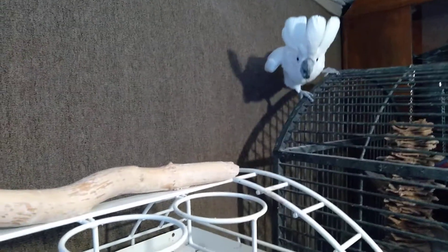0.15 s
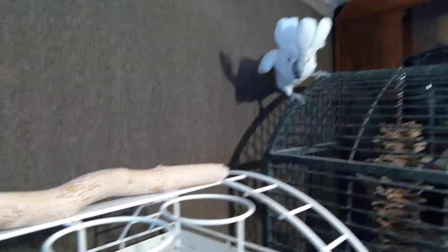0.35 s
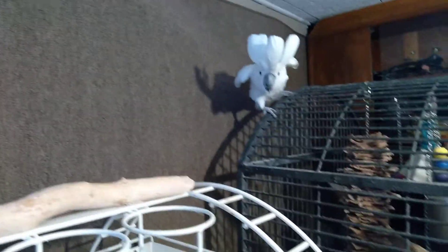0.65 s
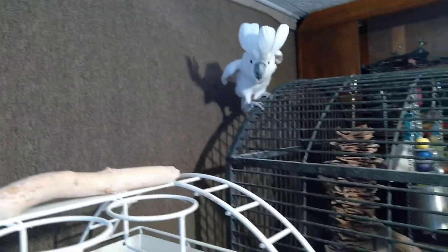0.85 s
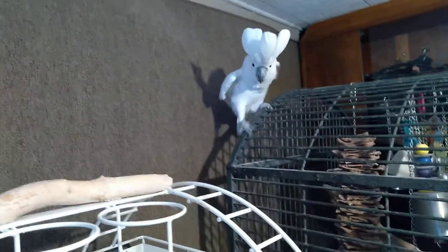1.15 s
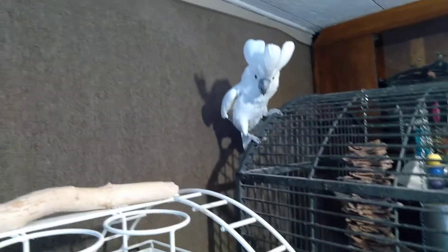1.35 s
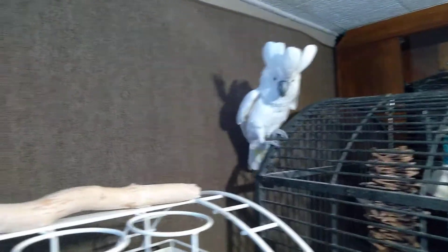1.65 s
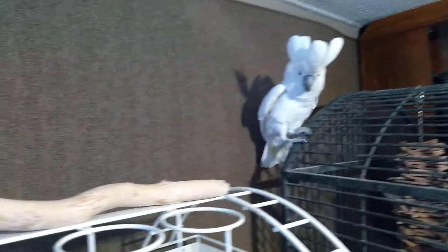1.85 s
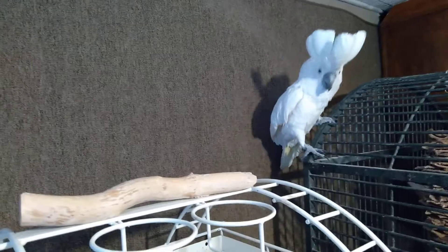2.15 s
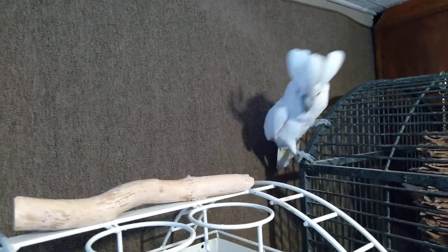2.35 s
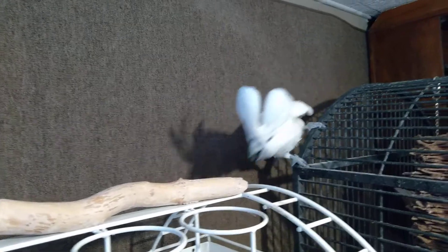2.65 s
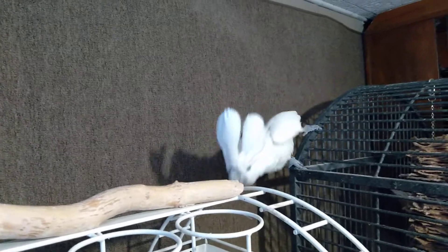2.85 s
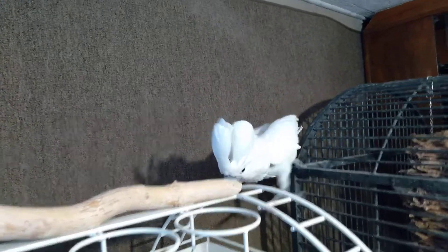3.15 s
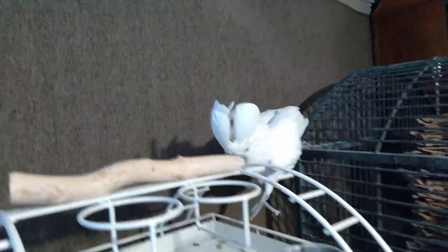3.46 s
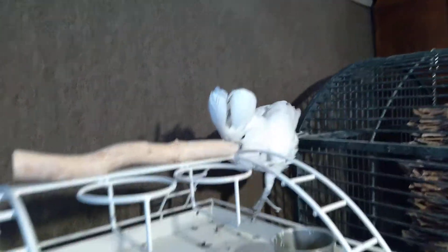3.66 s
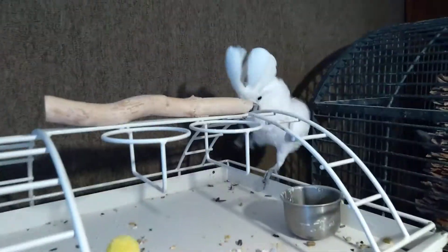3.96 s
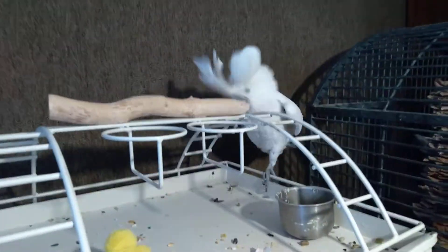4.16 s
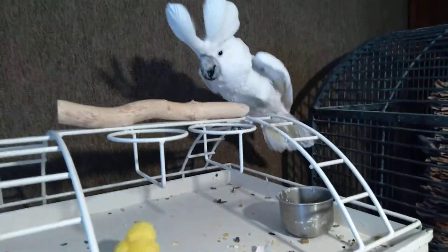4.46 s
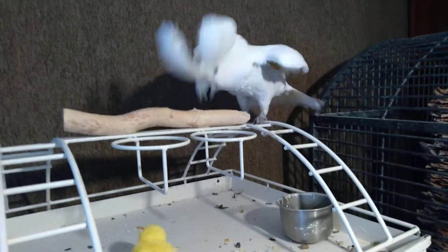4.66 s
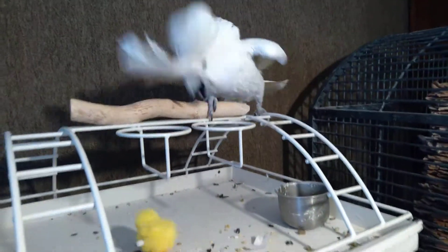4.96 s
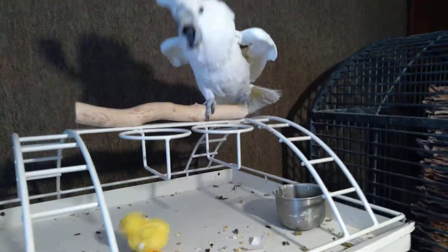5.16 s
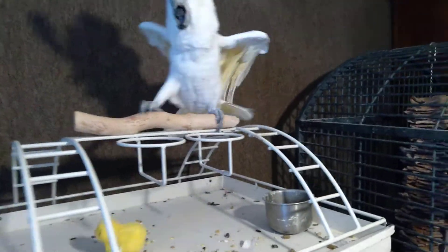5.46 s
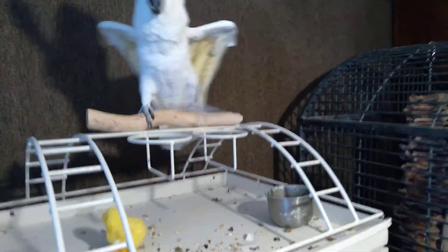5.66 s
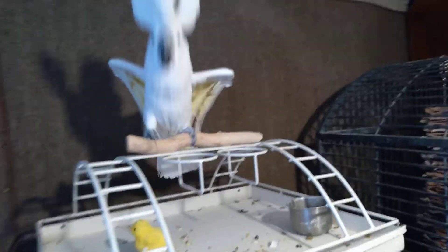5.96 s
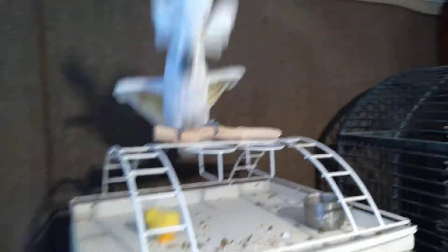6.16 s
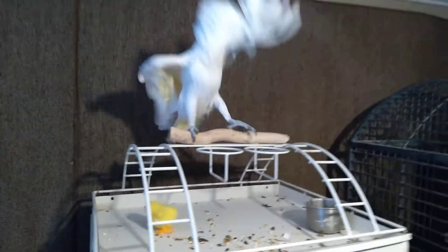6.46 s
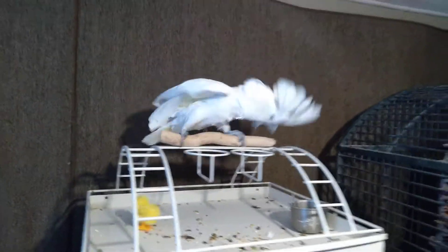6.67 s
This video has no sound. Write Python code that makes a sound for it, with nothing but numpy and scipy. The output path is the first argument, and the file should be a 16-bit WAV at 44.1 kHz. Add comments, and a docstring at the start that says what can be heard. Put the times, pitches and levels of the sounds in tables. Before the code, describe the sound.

Fast paired metal clicks, wiry scrapes and a dull drumming tray as a bird stand is dragged, with a short lull and late feathery rustles.

```python
"""Sharp metallic ticks, mostly in pairs, over scraping and low drumming: a metal bird stand on casters is
dragged over a hard floor in a small room, close to a two-port phone. Ticks are short noise contacts with
chatter; the tray drums in noise-driven modes; wire and feathers scrape and rustle as shaped noise bands;
a few touched wires ring; the frame bangs twice. Diffuse echoes and quiet room air lie behind."""
import sys
import numpy as np
from scipy import signal
from scipy.fft import rfft, irfft
from scipy.io import wavfile
from scipy.ndimage import uniform_filter1d

SR = 44100
rng = np.random.default_rng(int(sys.argv[2]) if len(sys.argv) > 2 else 0)


def output_pcm(signal):
    """Save a mono or channel-first signal as 16-bit PCM at the path in sys.argv[1].

    Samples are clipped to [-1, 1] before scaling.
    """
    pcm = np.clip(np.atleast_2d(signal).T, -1, 1) * 32767
    wavfile.write(sys.argv[1], SR, np.round(pcm).astype(np.int16))


N = 299880
TIME = np.arange(N) / SR


def undb(db):
    """Amplitude gain of a level in dB."""
    return 10 ** (np.asarray(db) / 20)


def unit(x):
    """Scale to an RMS of 1."""
    return x / np.sqrt(np.mean(x ** 2))


def fade(t, t60):
    """Exponential decay from t = 0, by 60 dB in t60 seconds."""
    return (t >= 0) * 1000. ** (-np.maximum(t, 0) / t60)


def colour(x, points):
    """Filter by (frequency [Hz], gain [dB]) points, joined over log frequency."""
    hz, db = np.transpose(points)
    f = np.fft.rfftfreq(N, 1 / SR) + 1
    gain_db = np.interp(np.log(f), np.log(hz), db)
    return irfft(rfft(x) * undb(gain_db), N)


def resonate(x, modes):
    """Sum of (frequency [Hz], width [Hz], power share [dB]) resonances."""
    out = 0
    for hz, width_hz, db in modes:
        b, a = signal.iirpeak(hz, hz / width_hz, SR)
        out = out + undb(db) / np.sqrt(width_hz) * signal.lfilter(b, a, x)
    return out


def highpass(x, hz):
    """Second-order bass cut."""
    return signal.sosfilt(signal.butter(2, hz, "high", fs=SR, output="sos"), x)


def walk(rate_hz):
    """Random levels held 1 / rate_hz and slewed; spread near 1."""
    hold = int(SR / rate_hz)
    steps = np.repeat(rng.standard_normal(N // hold + 1), hold)
    return uniform_filter1d(steps, hold)[:N]


def curves(table):
    """Each column of a time table as a curve over the whole scene."""
    s, *columns = np.transpose(table)
    return [np.interp(TIME, s, column) for column in columns]


def pan(left_minus_right_db):
    """Gains of the two ports."""
    return undb(left_minus_right_db * np.array([[.5], [-.5]]))


def spread(alike):
    """Noise at two ports from a wide source: a shared part and a part of their own."""
    shared = np.sqrt(alike) * rng.standard_normal(N)
    return shared + np.sqrt(1 - alike) * rng.standard_normal((2, N))


def crest(x, db):
    """Scale a short sound so that its loudest two milliseconds have the given level."""
    power = uniform_filter1d(np.mean(x ** 2, axis=0), size=100)
    return x * undb(db) / np.sqrt(power.max())


# room air spectrum: (frequency [Hz], density [dB per Hz])
AIR_SPECTRUM = [(15, -45.5), (25, -21), (80, -9.5), (175, -21.5), (335, -6.5), (1400, -27.5), (6210, -36.5),
                (9570, -30), (16000, -48)]
AIR_DB = -67


def hush():
    """Quiet air of the room: coloured noise, unrelated at the two ports."""
    return undb(AIR_DB) * np.array([unit(colour(rng.standard_normal(N), AIR_SPECTRUM)) for _ in range(2)])


ROOM_T60_S, ROOM_DB = 0.22, -10


def room(x):
    """Diffuse echoes, unrelated at the two ports: decaying noise as impulse response."""
    t = TIME[:SR // 2]
    tail = rng.standard_normal((2, len(t))) * fade(t - .002, ROOM_T60_S)
    tail /= np.sqrt(np.sum(tail ** 2, axis=1, keepdims=True))
    return undb(ROOM_DB) * signal.fftconvolve(x[None], tail, axes=1)[:, :N]


# the sound turns narrow and hollow as the stand draws away: (time [s], likeness at the ports [0-1],
# hollow share [0-1], tray left minus right [dB], casters left minus right [dB])
DRAWING_AWAY = [(0, 0, 0.12, 1.5, -6), (2, 0, 0, 0, -5.5), (5.2, 0.23, 0.22, 2, -2.5),
                (5.7, 0.3, 1, 8.5, 2.5), (6.8, 0.6, 0.67, 5, -3.5)]


def drawing_away():
    """Curves of likeness, hollowness, tray pan and caster pan as the stand draws away."""
    return curves(DRAWING_AWAY)


# hollow colour: (frequency [Hz], gain [dB])
HOLLOW_COLOUR = [(500, 2.5), (750, -9), (1050, -6), (1900, 2.5), (2450, -4), (2900, -15), (4100, 0),
                 (5000, 2), (6500, -4), (11000, 1), (14500, -0.5)]


def hollowed(x, share):
    """Blend from the plain sound to one with notches and bumps in its spectrum."""
    return x + share * (colour(x, HOLLOW_COLOUR) - x)


def wiry(x, depth_db):
    """Many wire modes make a jagged, fixed fine structure over frequency."""
    spectrum = rfft(x)
    bumps = uniform_filter1d(np.repeat(rng.standard_normal(N // 300 + 1), 150), size=150)
    return unit(irfft(spectrum * undb(depth_db * bumps[:spectrum.shape[-1]]), N))


# wire spectrum: (frequency [Hz], density [dB per Hz])
WIRE_SPECTRUM = [(1760, -25), (3000, -25), (3580, -17), (5110, -13.5), (6050, -13.5), (7380, -8),
                 (9600, -2), (10500, -5.5), (12100, -13.5), (15400, -15), (16300, -7.5)]
# frame body modes: (frequency [Hz], width [Hz], power share [dB])
BODY_MODES = [(1370, 2000, -4), (2540, 680, 1.5), (3160, 2900, 13)]
# sheet metal modes: (frequency [Hz], width [Hz], power share [dB])
SHEET_MODES = [(480, 31, -3.5), (735, 82, 4), (795, 24, -5), (888, 10, -3.5), (1130, 610, 3)]


def metal():
    """Unit noises in the colours of wire, body and sheet."""
    alike, *_ = drawing_away()
    body_band = signal.butter(2, (1150, 3600), "band", fs=SR, output="sos")
    body = signal.sosfilt(body_band, resonate(spread(alike), BODY_MODES))
    wire = colour(spread(alike), WIRE_SPECTRUM)
    sheet = resonate(spread(0.89), SHEET_MODES)
    return wiry(wire, 3.3), wiry(body, 2.4), unit(sheet)


# wire touches: (time [s], level [dB], t60 [s], thin wire relative level [dB])
WIRE_TOUCHES = [(1.183, -52, 0.41, 0), (1.262, -66, 0.076, 0), (1.533, -54, 0.33, 2),
                (1.708, -58, 0.23, -5), (1.752, -61, 0.19, -5), (1.864, -58, 0.12, -3)]
# touched wire modes: (frequency [Hz], width [Hz], power share [dB])
TOUCHED_MODES = [(10300, 1500, 7), (4730, 500, -8.5), (7600, 260, -12.5), (12500, 150, -14.5),
                 (2800, 120, -15)]
THIN_WIRE_HZ, THIN_WIRE_WIDTH_HZ = 9760, 40


def pings():
    """Wires buzz after a light touch; one thin wire sings along, more or less by touch."""
    wires = unit(resonate(spread(0.69), TOUCHED_MODES))
    thin = unit(resonate(spread(0.69), [(THIN_WIRE_HZ, THIN_WIRE_WIDTH_HZ, 0)]))
    return sum(undb(db) * fade(TIME - s, t60_s) * (wires + undb(thin_db) * thin)
               for s, db, t60_s, thin_db in WIRE_TOUCHES)


# feather swishes, the last row a brief tick: (middle [s], half length [s], centre [Hz], level [dB])
FEATHER_SWISHES = [(3.056, 0.024, 10000, -23), (5.322, 0.0056, 10800, -28), (5.621, 0.045, 7500, -30),
                   (6.598, .009, 9000, -25), (6.628, .013, 9300, -25), (6.635, .025, 6000, -37),
                   (6.686, .013, 9800, -25), (6.699, .009, 8000, -23), (6.7, .018, 5900, -36),
                   (6.761, .002, 8600, -26)]


def swishes():
    """Feathers brush the wires: grainy swells of narrow hiss; the last, very short one is a faint tick."""
    noise = spread(0.27) * unit(undb(2.7 * walk(250)))
    out = 0
    for s, half_s, hz, db in FEATHER_SWISHES:
        swell = np.exp(-((TIME - s) / half_s) ** 2 / 2)
        out = out + undb(db) * swell * unit(resonate(noise, [(hz, 0.12 * hz, 0)]))
    return out


def hum(modes):
    """Modes under a steady random drive; the swing evens out as the sheet stiffens when it bends."""
    out = 0
    for hz, width_hz, db in modes:
        drive = resonate(rng.standard_normal(N), [(hz, 3 * width_hz, 0)])
        x = unit(resonate(drive, [(hz, width_hz, 0)]))
        swing = np.sqrt(uniform_filter1d(x ** 2, int(2 * SR / hz)))
        out = out + undb(db) * x / (swing + .2) ** 0.38
    return unit(out)


# drum levels: (time [s], deepest modes [dB], next mode [dB], middle modes [dB], upper modes [dB])
DRUM_LEVELS = [(0.0, -54, -63, -56, -59.5), (0.32, -47, -56, -46.5, -45.5), (0.38, -44, -57, -43.5, -38),
               (0.47, -56, -53, -48, -40), (0.62, -49.5, -63, -59, -55), (0.76, -60, -49, -56, -52),
               (0.83, -58, -56, -61, -65), (0.87, -53, -50, -52, -43), (1.06, -57, -62, -57, -50),
               (1.23, -64, -80.5, -79.5, -70.5), (1.65, -89.5, -91, -77, -79.5),
               (2.14, -67, -67.5, -71.5, -56), (2.27, -77, -78, -76, -75), (2.52, -68, -76, -69, -62),
               (2.67, -54, -55.5, -44, -36.5), (2.73, -59, -70, -58, -41.5),
               (2.92, -57.5, -59.5, -52, -42.5), (3.11, -57.5, -63, -50.5, -47),
               (3.39, -47, -68, -45, -49.5), (3.45, -61, -60, -51, -61), (3.54, -51, -66, -47, -41.5),
               (3.66, -46, -55, -50.5, -43.5), (3.77, -42.5, -55, -45, -45), (4.07, -50, -52.5, -54, -58.5),
               (4.37, -54, -54, -55, -58), (4.53, -64, -61, -53.5, -62), (4.56, -43, -51, -49.5, -54.5),
               (4.64, -50, -51, -50.5, -60), (4.83, -51, -51, -50, -44.5), (4.92, -57, -60, -56, -56),
               (4.96, -46, -56, -48, -52), (5.06, -61, -48, -52, -53), (5.13, -54, -55, -56, -59),
               (5.49, -45.5, -67, -51, -49.5), (5.61, -62, -68, -58, -48.5), (5.85, -65, -81, -61.5, -52),
               (6.25, -59, -75, -67, -49), (6.3, -67, -59.5, -59, -52.5), (6.42, -74, -76.5, -71, -59),
               (6.8, -66, -71, -64, -68)]
# tray modes, the last of the low ones being the "next mode": (frequency [Hz], width [Hz], power share [dB])
LOW_MODES = [(81.6, 11, 6), (105, 27, -27), (145, 12, 2)]
MIDDLE_MODES = [(219.5, 51, -5.5), (242.2, 9.9, -4), (260.7, 19.5, -2.5)]
UPPER_MODES = [(320, 8.8, 2), (330, 25, -3.5), (415.4, 19, -15.5), (472.3, 35, -10)]
DRUM_SWELL_DB = 1.03


def tray():
    """Rolling vibration drives the lightly damped tray modes; it swells and sinks with the floor's bumps."""
    groups = LOW_MODES[:-1], LOW_MODES[-1:], MIDDLE_MODES, UPPER_MODES
    return sum(undb(db + DRUM_SWELL_DB * walk(13)) * hum(modes)
               for db, modes in zip(curves(DRUM_LEVELS), groups))


# rattle after each tick; rows wire, body, sheet: (level relative to tick [dB], t60 [s])
AFTER_RATTLE = [(-29, 0.25), (-10, 0.29), (-42, 0.67)]
# scrapes and rustles: (full at [s], swell before [s], held [s], wire [dB], body [dB], sheet [dB])
SCRAPE_STROKES = [(0.193, 0.0027, .012, -39, -63, -47.5), (.28, .02, 0.028, -50, -67, -71),
                  (.33, 0.01, 0.035, -35, -51, -46), (.39, .01, 0.027, -49, -53, -50),
                  (.59, 0.026, 0.058, -36, -51, -52), (.68, 0.018, 0.081, -41, -62, -56),
                  (0.872, 0.013, 0.052, -63, -36.5, -42), (1.05, .03, 0.051, -66, -72, -63.5),
                  (1.127, 0.0059, 0.016, -62, -61.5, -58), (1.47, .01, 0.024, -68.5, -83.5, -80),
                  (1.882, .004, .04, -53, -62.5, -67), (2.04, 0.025, 0.059, -42, -51, -56.5),
                  (2.153, .005, .004, -49, -66, -58), (2.187, .004, .004, -41, -56, -66),
                  (2.223, 0.0048, 0.013, -35, -52, -74), (2.41, .01, 0.034, -33, -41.5, -55),
                  (2.489, 0.048, 0.054, -31.5, -39, -50), (2.63, 0.064, 0.064, -23.5, -33.5, -32.5),
                  (2.809, 0.069, 0.043, -32, -41.5, -47), (2.9, 0.041, 0.2, -38.5, -47, -46.5),
                  (3.2, 0.015, 0.011, -39, -46, -46), (3.325, .005, 0.033, -45, -54, -54.5),
                  (3.47, 0.0046, 0.015, -36, -51, -54), (3.596, .006, .01, -42, -46, -49),
                  (3.7, 0.017, 0.055, -41, -56, -56), (3.791, 0.021, 0.09, -50, -42, -53.5),
                  (4.102, 0.074, .15, -38, -47.5, -56.5), (4.4, 0.031, 0.06, -53, -53.5, -64),
                  (4.52, 0.016, 0.043, -34, -48.5, -71), (4.65, .02, 0.027, -46, -56, -64),
                  (4.749, 0.056, 0.036, -40, -45, -47), (4.95, 0.027, 0.031, -44, -50, -48.5),
                  (5.033, .006, .008, -41, -52, -52), (5.075, .004, .006, -34.5, -60, -54),
                  (5.17, .02, 0.06, -37, -54, -51.5), (5.29, .006, .12, -36, -52.5, -54),
                  (5.43, 0.019, 0.17, -34.5, -45, -55), (5.57, 0.053, .11, -40, -48, -65),
                  (5.98, 0.022, 0.033, -38.5, -46.5, -58), (6.125, 0.0071, 0.014, -41, -49, -77),
                  (6.25, 0.026, .12, -39, -45, -55.5), (6.4, 0.026, 0.037, -42.5, -48.5, -58),
                  (6.59, 0.025, 0.11, -28, -45, -52), (6.75, 0.012, .05, -31, -54, -56)]
STROKE_T60_S, T60_PER_SWELL = 0.14, 3.7  # a slow swell also dies slowly


def stirred():
    """Levels of wire, body and sheet: dying rattle after each tick plus the strokes, summed as power."""
    s, wire_db, body_db, _ = np.transpose(CASTER_TICKS)
    power = np.zeros((len(AFTER_RATTLE), N))
    for row, blow_db, (after_db, t60_s) in zip(power, (wire_db, body_db, wire_db), AFTER_RATTLE):
        row[(s * SR).astype(int)] = undb(blow_db + after_db) ** 2
        row[:] = signal.lfilter([1], [1, -fade(2 / SR, t60_s)], row)  # power fades twice as fast
    for start_s, swell_s, held_s, *levels_db in SCRAPE_STROKES:
        i = slice(max(int((start_s - swell_s) * SR), 0), int((start_s + held_s + 1) * SR))
        t = TIME[i] - start_s
        swell = np.clip(1 + t / swell_s, 0, 1)
        shape = swell * fade(np.maximum(t - held_s, 0), STROKE_T60_S + T60_PER_SWELL * swell_s)
        power[:, i] += (undb(levels_db)[:, None] * shape) ** 2
    return np.sqrt(power)


# wire bands: (frequency [Hz], relative level [dB])
WIRE_BANDS = [(4700, 4.5), (6940, 3.5), (9900, -1), (13700, -1)]
# body bands: (frequency [Hz], width [Hz], relative level [dB])
RUFFLED_BANDS = [(1320, 760, 1.1), (2164, 760, -0.9), (3110, 1060, -0.2)]


def scrape():
    """Grainy friction: fast uneven bursts on the wires; bands of wire and body come and go separately."""
    wire, body, sheet = metal()
    on_wire, on_body, on_sheet = stirred()
    grain = unit(undb(1.6 * walk(600) + 4.2 * np.tanh(walk(70))))
    patchy = sum(undb(3.1 * walk(25)) * resonate(wire, [(hz, 2500, db)]) for hz, db in WIRE_BANDS)
    ruffled = sum(undb(4.3 * walk(40)) * resonate(body, [band]) for band in RUFFLED_BANDS)
    out = on_wire * grain * unit(patchy)
    out = out + on_body * unit(ruffled)
    return out + on_sheet * undb(2.9 * walk(30)) * sheet


# frame bangs: (time [s], level [dB], rattle length [s], t60 [s], low thud relative level [dB])
FRAME_BANGS = [(0.861, -23, 0.014, 0.16, -6), (3.779, -13.5, 0.037, 0.067, -42)]


def bangs(wire, body, sheet):
    """The frame rattles in dense bounces, then rings out; the sheet thuds below."""
    out = 0
    for s, db, rattle_s, t60_s, thud_db in FRAME_BANGS:
        bounces, ring = undb(2.3 * walk(300)), 1.3 * fade(TIME - s - rattle_s, t60_s)
        shape = (TIME >= s) * np.where(TIME < s + rattle_s, bounces, ring)
        thud = undb(thud_db) * fade(TIME - s, 2.5 * t60_s) * sheet
        out = out + undb(db) * (shape * (wire + undb(-21.5) * body) + thud)
    return out


# caster ticks: (time [s], wire peak [dB], body peak [dB], rise [s])
CASTER_TICKS = [(0.001, -13.5, -35.0, 0.0015), (0.0227, -13, -40, 0.00064), (0.1057, -14.5, -30, 0.00071),
                (0.1352, -15.0, -37.0, 0.001), (0.2269, -14, -31.5, 0.00081), (0.2595, -13.5, -40, 0.0015),
                (0.3272, -31, -37, 0.0012), (0.3417, -14.5, -28.5, 0.0038), (0.3682, -15, -34, 0.0011),
                (0.4369, -15.5, -28.5, 0.0022), (0.4606, -13.5, -39, 0.0008),
                (0.5283, -16.5, -31.5, 0.0009), (0.557, -14.5, -37, 0.001), (0.6301, -14.0, -30, 0.0017),
                (0.6532, -12, -41, 0.0008), (0.7035, -31, -49.0, 0.0017), (0.7226, -14, -29.5, 0.0014),
                (0.7496, -14.0, -42, 0.001), (0.8599, -12.5, -36.5, 0.0032), (1.93, -22.0, -38, 0.0016),
                (2.0166, -19.5, -38, 0.0009), (2.2321, -20, -42.5, 0.0011), (2.2587, -17, -41.5, 0.00087),
                (2.3422, -18, -37, 0.00084), (2.3997, -16, -32.5, 0.00088), (2.55, -13, -39, 0.0012),
                (2.7313, -17, -35, 0.0008), (2.826, -18.0, -29, 0.0011), (2.924, -16.5, -32, 0.0016),
                (2.9944, -16.5, -31.5, 0.00068), (3.023, -16, -42, 0.0031), (3.1217, -12.5, -32.5, 0.0015),
                (3.1479, -16, -36.0, 0.00074), (3.2448, -13.5, -30.5, 0.00071),
                (3.2763, -13.5, -34.5, 0.0019), (3.3901, -14.5, -32, 0.00072),
                (3.4223, -12.5, -37.5, 0.0008), (3.5173, -15, -29, 0.0012), (3.5441, -12.5, -36.0, 0.00091),
                (3.6435, -13.5, -27, 0.00078), (3.6773, -12.0, -35, 0.0008), (3.7782, -8.5, -38, 0.0016),
                (3.7907, -5, -34, 0.0025), (3.921, -14.5, -32.5, 0.0011), (3.9475, -11.5, -34.5, 0.0008),
                (4.0562, -16, -34.5, 0.001), (4.0711, -14, -42, 0.0008), (4.1197, -17.5, -36.5, 0.00083),
                (4.1387, -12, -42, 0.00074), (4.2067, -14.5, -37.5, 0.001), (4.2263, -12.5, -35, 0.0008),
                (4.323, -14.0, -33, 0.0012), (4.349, -14, -45, 0.0011), (4.4703, -14.5, -33.5, 0.0008),
                (4.4932, -16, -40, 0.0011), (4.5242, -21, -51, 0.0007), (4.5959, -15.0, -33, 0.0008),
                (4.6137, -14.5, -33, 0.0019), (4.6845, -15.5, -34, 0.00059), (4.709, -12, -37.0, 0.0014),
                (4.866, -14.5, -35.0, 0.00086), (4.8878, -15, -42, 0.00092), (4.9804, -15.5, -34.5, 0.0014),
                (5.001, -13, -37, 0.0009), (5.086, -15.5, -33, 0.00088), (5.1211, -14.0, -41.0, 0.00074),
                (5.1693, -24, -52, 0.0008), (5.2139, -15.5, -36.5, 0.001), (5.2458, -12.5, -41, 0.0012),
                (5.3446, -11.5, -34, 0.0008), (5.3764, -15.5, -44, 0.00074), (5.4771, -13.0, -36, 0.0017),
                (5.503, -14, -40.0, 0.0008), (5.6046, -13, -32.5, 0.00098), (5.6374, -13.5, -41.0, 0.0008),
                (5.77, -16.5, -37, 0.0015), (5.7966, -17, -44, 0.0008), (5.8476, -27, -41.5, 0.0008),
                (5.9, -18, -41, 0.0024), (5.933, -18.0, -46, 0.0008), (6.0446, -18, -34.5, 0.0026),
                (6.0773, -16.5, -42, 0.0009), (6.182, -15, -39.5, 0.001), (6.2137, -18.5, -40, 0.0008),
                (6.3314, -21, -39, 0.0021), (6.3618, -17.5, -43.0, 0.000799), (6.4713, -18.5, -42, 0.0012),
                (6.5001, -18.5, -43, 0.0013), (6.5538, -25, -41, 0.0009), (6.7923, -20, -47.0, 0.0021)]
PAIR_S = .04  # ticks closer than this form a pair
LEAD_T60_S, TRAIL_T60_S, LONE_T60_S = 0.062, 0.044, 0.088
CONTACT_T60_S, KNOCK_T60_S, BODY_CHATTER, PAN_SCATTER_DB = .012, .008, 0.69, 0.86
TINT_HZ, TINT_OCTAVES, TINT_GAIN = 8120, 0.41, 0.66  # each tick favours a few wires of its own


def chatter_t60s():
    """Chatter decay of each tick: the second of a pair is the driest, a lone tick chatters longest."""
    gaps_s = np.diff(np.transpose(CASTER_TICKS)[0], prepend=-np.inf, append=np.inf)
    close = gaps_s < PAIR_S
    return np.where(close[:-1], TRAIL_T60_S, np.where(close[1:], LEAD_T60_S, LONE_T60_S))


def ticks(wire, body):
    """A sharp contact from one point, then a short chatter all over the frame; each tick has its own tint."""
    point = unit(colour(rng.standard_normal(N), WIRE_SPECTRUM))
    ragged = unit(undb(2.34 * walk(350)))  # the chatter comes in uneven bounces
    out, t = np.zeros((2, N)), TIME[:SR // 6]
    *_, caster_pan_db = drawing_away()
    scatter = rng.standard_normal((len(CASTER_TICKS), 3))
    for (s, wire_db, body_db, rise_s), t60_s, (tilt, aside, pitch) in zip(CASTER_TICKS, chatter_t60s(), scatter):
        start = max(int((s - rise_s) * SR), 0)
        n = min(len(t), N - start)
        i = slice(start, start + n)
        rise = np.minimum(t[:n] / rise_s, 1) ** 2
        late = np.maximum(t[:n] - rise_s, 0)
        contact = rise * fade(late, CONTACT_T60_S)
        chatter = rise * fade(late, t60_s) * ragged[i]
        tick = contact * (point[i] + 0.77 * wire[:, i]) + 0.71 * chatter * wire[:, i]
        tick = signal.lfilter([1, 0.25 * tilt - 0.3], [1], tick)  # brightness varies by tick
        hz = min(TINT_HZ * 2 ** (TINT_OCTAVES * pitch), SR / 3)
        tick = tick + TINT_GAIN * signal.lfilter(*signal.iirpeak(hz, 4.5, SR), tick)
        knock = rise * fade(late, KNOCK_T60_S) * body[0, i] + BODY_CHATTER * chatter * body[:, i]
        pan_db = caster_pan_db[start] + PAN_SCATTER_DB * aside
        out[:, i] += pan(pan_db) * (crest(tick, wire_db) + crest(knock, body_db))
    return highpass(out, 800.)  # small parts radiate no bass


LEFT_LAG_SAMPLES = 6  # the stand is nearer the right port


def scene():
    """Stand sounds at the two ports, their echoes and the room air."""
    wire, body, sheet = metal()
    _, hollow, tray_pan_db, _ = drawing_away()
    near = ticks(wire, body) + bangs(wire, body, sheet) + pings() + scrape() + swishes()
    near = hollowed(near, hollow)
    drum = tray()
    wet = room(near.mean(axis=0) + 0.57 * drum)
    near = near + drum * pan(tray_pan_db)
    near[0] = np.roll(near[0], LEFT_LAG_SAMPLES)
    return near + wet + hush()


# port colours: (frequency [Hz], left minus right [dB])
PORT_COLOURS = [(60, -4.5), (300, -2), (700, -3.5), (2400, 0), (4400, 3), (7000, 1.5), (8300, 7),
                (9800, -6.5), (11500, -2), (14000, 3.5)]
BASS_CUT_HZ, TOP_HZ, CLIP_LEVEL = 60., 15700, .97


def record(dry):
    """Each port has its own colour; deep bass is lost; the loudest peaks clip; the top is cut."""
    ports = [colour(c, [(hz, side * db / 2) for hz, db in PORT_COLOURS]) for c, side in zip(dry, (1, -1))]
    clipped = np.clip(highpass(ports, BASS_CUT_HZ), -CLIP_LEVEL, CLIP_LEVEL)
    return signal.sosfilt(signal.ellip(10, .1, 60, TOP_HZ, fs=SR, output="sos"), clipped)


dry = scene()
out = record(dry)
output_pcm(out)
```